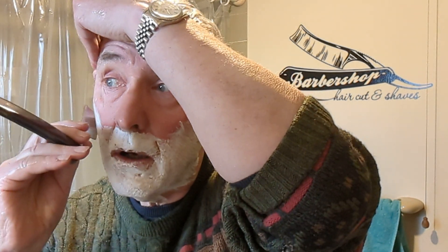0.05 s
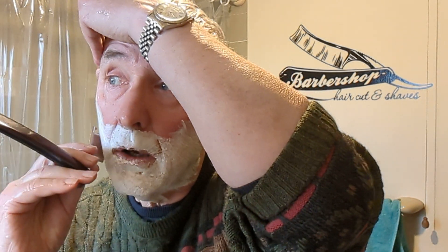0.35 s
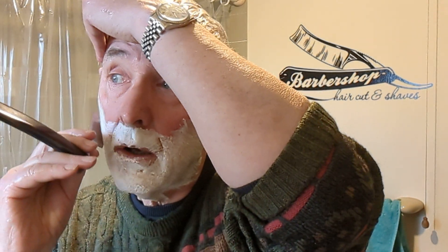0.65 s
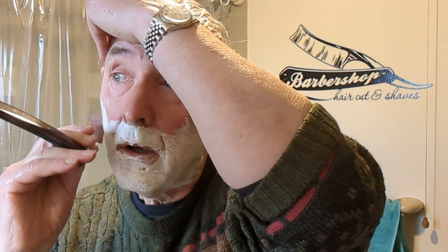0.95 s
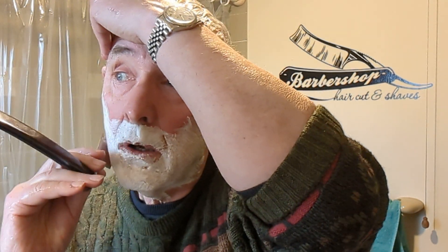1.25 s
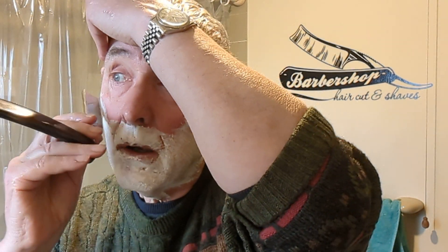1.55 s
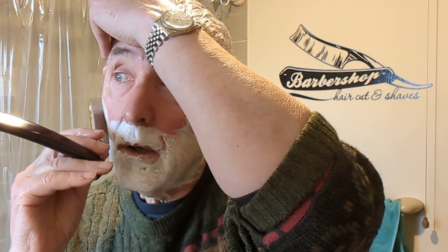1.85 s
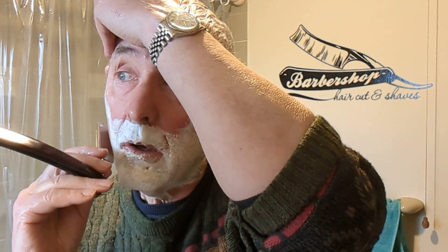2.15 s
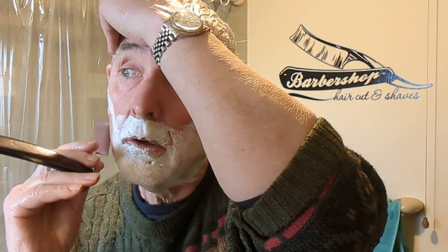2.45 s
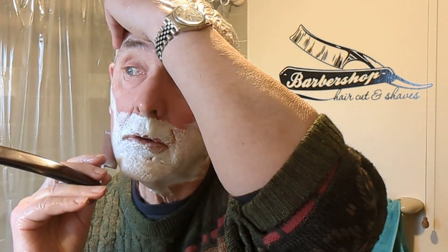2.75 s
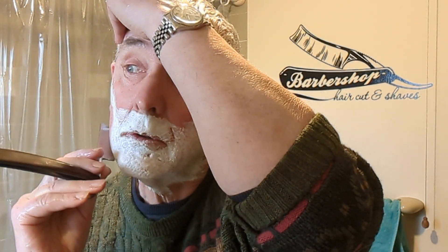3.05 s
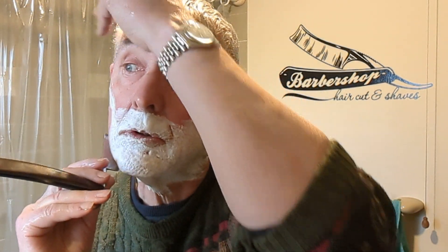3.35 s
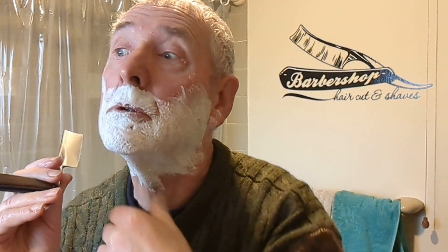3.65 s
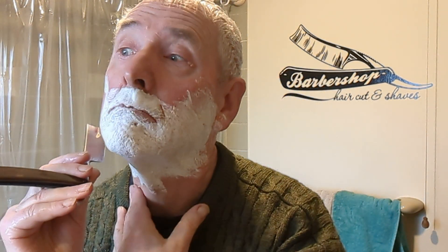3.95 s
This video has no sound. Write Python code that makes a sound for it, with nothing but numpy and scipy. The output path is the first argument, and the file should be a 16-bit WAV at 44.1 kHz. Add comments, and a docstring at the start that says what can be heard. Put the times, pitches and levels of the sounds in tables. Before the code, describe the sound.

Close, quiet rasps of a straight razor shaving stubble come one after another, with tiny clicks as coarse hairs part. A low hum wavers under them in a small bathroom, and a faint brush of wool follows the last stroke.

```python
"""A straight razor scrapes through lathered stubble in short strokes, in a small tiled bathroom.
Each stroke is a dense crackle of cut hairs that rings the thin blade; thick hairs snap one by one.
Behind it a low hum, probably a ventilation fan, swells and sags over the soft rush of the room.
At the end a woollen sleeve brushes by as the arm comes down."""
import sys
import numpy as np
from scipy import signal
from scipy.fft import rfft, irfft
from scipy.io import wavfile

SR = 44100
rng = np.random.default_rng(int(sys.argv[2]) if len(sys.argv) > 2 else 0)


def transcribe(u):
    """Save the signal u as a 16-bit wav file named by the first command-line argument.

    u: samples, shape (n,) or (channels, n), limited to [-1, 1]; the rate is SR.
    q: integer samples, one column per channel.
    """
    v = np.clip(np.atleast_2d(u).T, -1, 1)
    q = np.round(v * 32767).astype(np.int16)
    wavfile.write(sys.argv[1], SR, q)


N = 176400
T = np.arange(N) / SR


def from_db(db):
    """Turn decibels into a number to multiply a sound by."""
    return 10 ** (np.asarray(db) / 20)


def unit_power(x):
    """Scale a sound so that its average power is 1."""
    return x / np.sqrt(np.mean(x ** 2) + 1e-20)


def at_hz(points, hz):
    """Read a table between its rows, with every octave equally wide."""
    row_hz, values = np.transpose(points)
    return np.interp(np.log(hz + 1), np.log(row_hz), values)


def drift(hz):
    """A smooth random wander of about 1 either way; a higher hz makes it quicker."""
    step, settle = 40, 2000
    keep = np.exp(-2 * np.pi * hz * step / SR)
    noise = rng.standard_normal(N // step + settle + 2)
    slow = signal.lfilter([1], [1, -2 * keep, keep * keep], noise)[settle:]
    return np.interp(np.arange(N) / step, np.arange(len(slow)), unit_power(slow))


def response(colour, size=2048):
    """How a single click sounds once it is given a tone colour (rows of Hz and dB)."""
    gains = from_db(at_hz(colour, np.fft.rfftfreq(size, 1 / SR)))
    cepstrum = irfft(np.log(gains))
    # Folding the second half onto the first packs the energy at the start of the click.
    cepstrum[1:size // 2] *= 2
    cepstrum[size // 2 + 1:] = 0
    click = irfft(np.exp(rfft(cepstrum)))
    return click / np.linalg.norm(click)


def through(x, click):
    """Pass a sound through something, given how that thing answers one click."""
    return signal.fftconvolve(x, click)[:N]


def resonate(x, hz, width_hz):
    """Let a sound ring at one pitch; a narrower width rings longer."""
    keep = np.exp(-np.pi * width_hz / SR)
    feedback = [1, -2 * keep * np.cos(2 * np.pi * hz / SR), keep * keep]
    return signal.lfilter(np.array([1, 0, -1]) * (1 - keep * keep) / 2, feedback, x)


def fan_hum(mains_buzz_hz=100.6, upper_tone_db=-25, trim_db=-.5):
    """A deep wavering tone, probably a fan, with a faint second tone one mains buzz above it."""
    # The course of the hum. Each row: time in seconds, pitch in Hz, relative level in dB.
    course = [(0.0, 72.5, -59), (0.21, 71.8, -54), (0.8, 72.22, -55.5), (1.0, 74.02, -68.5),
              (1.22, 73.46, -54.5), (1.67, 75, -47), (1.73, 76.1, -53.5), (2.37, 77.83, -38),
              (2.72, 78.8, -41.5), (2.91, 80.34, -51.5), (3.05, 80.3, -41), (3.31, 80.23, -42.5),
              (3.49, 79.25, -38), (3.56, 77.74, -43.5), (3.62, 73.25, -65), (3.66, 73.5, -47.5),
              (3.89, 70.6, -45.5), (4.0, 75.96, -47.5)]
    # Where the hum sits. Each row: time in seconds, how much louder the left is in dB.
    lean = [(0, -1), (1.5, -0.9), (2.3, 0), (3.2, 0), (4, -1.8)]
    seconds, hz, db = np.transpose(course)
    phase = 2 * np.pi * np.cumsum(np.interp(T, seconds, hz)) / SR
    pan_db = np.interp(T, *np.transpose(lean)) * [[.5], [-.5]]
    level = np.sqrt(2) * from_db(np.interp(T, seconds, db) + trim_db + pan_db)
    upper_tone = from_db(upper_tone_db) * np.sin(phase + 2 * np.pi * mains_buzz_hz * T)
    return level * (np.sin(phase) + upper_tone)


def room_air(rush_db=-61, ring_db=-80, waver_db=3):
    """The room rushes softly, alike on both sides in the bass, with one faint, wavering ring."""
    # The colour of the still room. Each row: frequency in Hz, relative level in dB.
    colour = [(15, -42), (25, -19), (45, -19), (77, -2.5), (98, -8.5), (125, -16), (207, -22.5),
              (363, -22.5), (856, -37), (4260, -38.5), (6370, -43), (9770, -54.5), (15000, -52.5)]
    # How alike left and right are. Each row: frequency in Hz, likeness from 0 (unrelated) to 1 (same).
    likeness = [(60, .97), (150, 0.85), (280, 1), (500, 0), (1200, 0.076), (4000, 0.058), (12000, 0)]
    # Where the rush sits. Each row: frequency in Hz, how much louder the left is in dB.
    lean = [(120, -2.5), (300, 4), (600, 0.5), (1100, 1), (8000, 0.5)]
    hz = np.fft.rfftfreq(N, 1 / SR)
    shared, opposed = rfft(rng.standard_normal((2, N))) * from_db(at_hz(colour, hz))
    alike = at_hz(likeness, hz)
    both_sides = np.sqrt(1 + alike) * shared + np.sqrt(1 - alike) * opposed * [[1], [-1]]
    pan = from_db(at_hz(lean, hz) * [[.5], [-.5]])
    rush = unit_power(irfft(pan * both_sides, N))
    ring = resonate(rng.standard_normal((2, N)), hz=1170, width_hz=100)
    ring = unit_power(ring * from_db(waver_db * drift(hz=9)))
    return from_db(rush_db) * rush + from_db(ring_db) * ring


def stroke_pressure(attack_db_per_s=1800, release_db_per_s=470):
    """Each stroke bites, swells or eases, holds and lifts; gives the force on fine and coarse stubble."""
    # The blade on the skin. Each row: times of bite, full pressure and lift in seconds, relative
    # levels at the bite and at full pressure in dB, extra level for coarse stubble in dB.
    strokes = [(.137, .16, .165, -65, -63, -1), (.18, .29, .30, -47.5, -48, -4),
               (.305, .34, .385, -47, -44.5, -1), (.43, .455, .475, -64, -62, 0),
               (.634, .65, .66, -59, -58, 0), (.675, .80, .85, -53, -42.5, -1),
               (.90, .93, .948, -65, -65, -4), (1.118, 1.235, 1.308, -57, -45, -1),
               (1.355, 1.375, 1.392, -62, -61, -2), (1.785, 1.85, 1.875, -60, -57, -3),
               (1.882, 1.925, 1.985, -51, -44, -1), (2.0, 2.07, 2.09, -48, -56, -5),
               (2.105, 2.22, 2.26, -53, -58, -10), (2.275, 2.32, 2.364, -53, -48.5, 1),
               (2.653, 2.67, 2.695, -51, -51, 3), (2.71, 2.825, 2.842, -54, -48.5, 2),
               (3.184, 3.21, 3.232, -56, -50, 0), (3.245, 3.265, 3.28, -59, -62, -6),
               (3.29, 3.31, 3.332, -55, -53, -1), (3.364, 3.385, 3.42, -54, -66, 3),
               (3.459, 3.464, 3.47, -53, -55, -18)]
    fine, coarse = np.zeros(N), np.zeros(N)
    for bite, full, lift, bite_db, full_db, coarse_db in strokes:
        off_skin_db = attack_db_per_s * np.maximum(bite - T, 0)
        off_skin_db += release_db_per_s * np.maximum(T - lift, 0)
        force = from_db(np.interp(T, [bite, full], [bite_db, full_db]) - off_skin_db)
        fine = np.maximum(fine, force)
        coarse = np.maximum(coarse, force * from_db(coarse_db))
    return fine, coarse


def hair_snaps(fade_s=.0013, body_db=-6, edge_db=-6.5, size=600):
    """A thick hair parts in a brief crumble; gives the kicks to the blade's edge and to its body."""
    # Single thick hairs, and last the blade's final flick. Each row: start in seconds, relative strength in dB,
    # relative brightness in dB.
    snaps = [(0.136, -48.5, -6), (0.168, -50, 12), (0.195, -41.5, 8.5), (.578, -59, -6), (0.587, -62, -13),
             (.631, -43.5, -11), (0.648, -51.5, 12.5), (1.102, -58, 11.5), (1.72, -56, 10.5),
             (1.758, -43.5, -8), (1.766, -40, -6), (1.782, -39.5, 1.5), (1.849, -37.5, -1), (1.899, -37, 2),
             (2.108, -51.5, 12.5), (2.292, -38, -12), (2.65, -33, -7), (2.687, -34.5, -8),
             (2.736, -36.5, -12), (2.806, -35.5, -14), (2.834, -31.5, -18), (3.181, -42, -9),
             (3.295, -29, -14), (3.362, -39.5, -8), (3.375, -38, -9), (3.456, -59.5, 12.5)]
    edge, body = np.zeros(N), np.zeros(N)
    for start_s, strength_db, bright_db in snaps:
        crack = rng.standard_normal(size) * np.exp(-np.arange(size) / SR / fade_s)
        kick = 7 * from_db(strength_db) * crack / np.linalg.norm(crack)
        start = int(start_s * SR)
        body[start:start + size] += kick * from_db(body_db)
        edge[start:start + size] += kick * from_db(edge_db + bright_db)
    return edge, body


def crackle(per_s, spread_db):
    """Hairs give way as tiny clicks of uneven size at random moments."""
    sizes = from_db(spread_db * np.minimum(rng.exponential(1, N), 4)) * rng.choice([-1, 1], N)
    return unit_power(sizes * (rng.random(N) < per_s / SR))


def steel_ring(tones, low_cut_hz=910, size=2048):
    """Thin steel answers one click by ringing at all its tones at once, with little bass."""
    click = signal.unit_impulse(size)
    ring = sum(from_db(db) * resonate(click, hz, width_hz) * (-1) ** k
               for k, (hz, width_hz, db) in enumerate(tones))
    ring = signal.sosfilt(signal.butter(2, low_cut_hz, "high", fs=SR, output="sos"), ring)
    return ring / np.linalg.norm(ring)


def razor(chatter_hz=70, chatter_db=1.17, edge_hz=6394, edge_width_hz=520):
    """Fine hairs rasp along the edge and make it sing as it catches; coarse ones ring the blade."""
    # The colour of the edge's rasp. Each row: frequency in Hz, relative level in dB.
    rasp_colour = [(200, -15.5), (500, -24), (700, -15), (900, -30), (1150, -9.5), (1400, -30.5),
                   (1950, -17), (2300, -28.5), (2700, -18.5), (4200, -3.5), (5000, -6.5), (5650, 1.5),
                   (6500, -2.5), (7600, 1), (8100, -8.5), (8800, -3), (9600, -10), (10100, -7.5),
                   (10700, -8.5), (12600, -6), (13000, -5.5), (14000, -5.5), (15600, -8), (18000, -22.5)]
    # The tones of the bending blade. Each row: pitch in Hz, width in Hz, relative level in dB.
    blade_tones = [(1160, 57, -14.5), (2700, 230, -10), (3253, 374, -7.5), (3716, 367, 1.5), (4404, 324, 3),
                   (4750, 390, -9.5)]
    fine, coarse = stroke_pressure()
    edge_kicks, body_kicks = hair_snaps()
    chatter = from_db(chatter_db * drift(chatter_hz))  # the blade sticks and slips
    rasp = from_db(-1) * (edge_kicks + fine * chatter * crackle(per_s=2200, spread_db=2.5))
    catches = from_db(-3.5) * (2 * edge_kicks + fine * chatter * crackle(per_s=500, spread_db=2))
    cuts = body_kicks + from_db(-4.5) * coarse * chatter * crackle(per_s=300, spread_db=-1)
    edge = through(rasp, response(rasp_colour))
    edge += through(catches, steel_ring([(edge_hz, edge_width_hz, 0)]))
    body = through(cuts, steel_ring(blade_tones))
    return bathroom(edge, room_db=-1) + bathroom(body, room_db=-3.5)


def bathroom(x, room_db, travel_s=.0008, echo_s=.0086, echo_db=-13.5, tail_s=.19, hand_hz=2.97):
    """Sound arrives directly, off the near wall, and in a short tiled tail that shifts with the hand."""
    # Balance at the two microphones. Each row: frequency in Hz, how much louder the left is in dB.
    lean = [(300, -1), (700, 12), (1150, -2), (2300, 0), (3300, 5.5), (3900, -1.5), (4300, 3.5),
            (5200, 1.5), (6350, 5), (7800, -6.5), (9600, 2.5), (11500, -1.5), (15000, -0.5)]
    # Timing at the two microphones. Each row: frequency in Hz, how far the left is ahead in radians.
    left_lead = [(400, 1.5), (2300, 0.5), (2800, 1.7), (3700, -0.95), (4200, 0.64), (4650, 0.7), (5200, -2),
                 (7300, -2), (8500, -7.5), (11000, -7.5), (13500, -5)]
    size = 16384
    t, hz = np.arange(size) / SR, np.fft.rfftfreq(size, 1 / SR)
    direct = np.exp(-2j * np.pi * hz * travel_s)
    paths = direct * (1 + from_db(echo_db) * np.exp(-2j * np.pi * hz * echo_s))
    # The moving hand keeps sharing the sound out differently among three tails.
    shares = np.array([drift(hand_hz) for _ in range(3)])
    shares /= np.linalg.norm(shares, axis=0)
    sides = []
    for side in (1, -1):  # left, then right
        balance = from_db(side * at_hz(lean, hz) / 2)
        lead = np.exp(.5j * side * at_hz(left_lead, hz))
        heard = through(x, irfft(paths * balance * lead)[:size // 8])
        for share in shares:
            tail = rng.standard_normal(size) * from_db(-60 * t / tail_s) * (t > .002)
            tail = irfft(rfft(tail / np.linalg.norm(tail)) * balance)[:size * 3 // 4]
            heard += from_db(room_db) * through(x * share, tail)
        sides.append(heard)
    return np.array(sides) / np.sqrt(1 + from_db(room_db) ** 2)


def sleeve(start_s=3.555, attack_s=.005, fade_s=.04, gain_db=-66):
    """Wool gives one soft brush as the arm comes down."""
    # The colour of rubbing wool. Each row: frequency in Hz, relative level in dB.
    wool_colour = [(150, 0), (480, 8), (900, 2.5), (1200, 2), (2400, -4), (5000, -20), (16000, -28)]
    age = np.maximum(T - start_s, 0)
    swell = np.minimum(age / attack_s, 1) * np.exp(-age / fade_s)
    rub = from_db(gain_db) * swell * rng.standard_normal(N)
    return bathroom(through(rub, response(wool_colour)), room_db=-8)


def scene():
    """Razor and sleeve sound over the hum and air of the room."""
    return razor() + sleeve() + fan_hum() + room_air()


def record(dry):
    """The very highest treble is cut off steeply."""
    cutoff_hz = 15750
    return signal.sosfilt(signal.ellip(10, .1, 70, cutoff_hz, fs=SR, output="sos"), dry)


dry = scene()
out = record(dry)
transcribe(out)
```